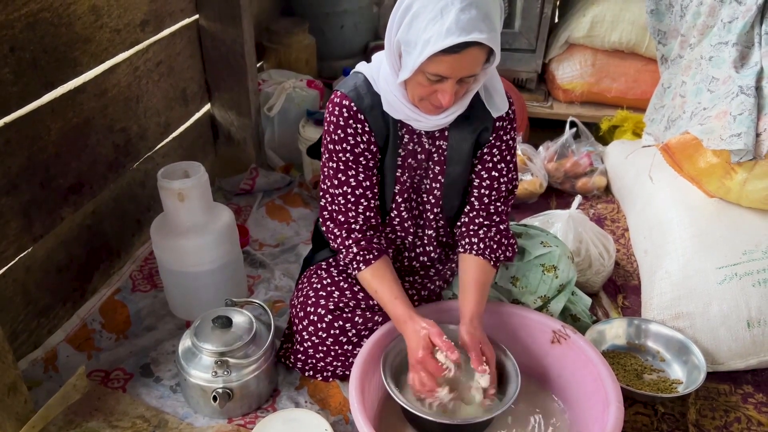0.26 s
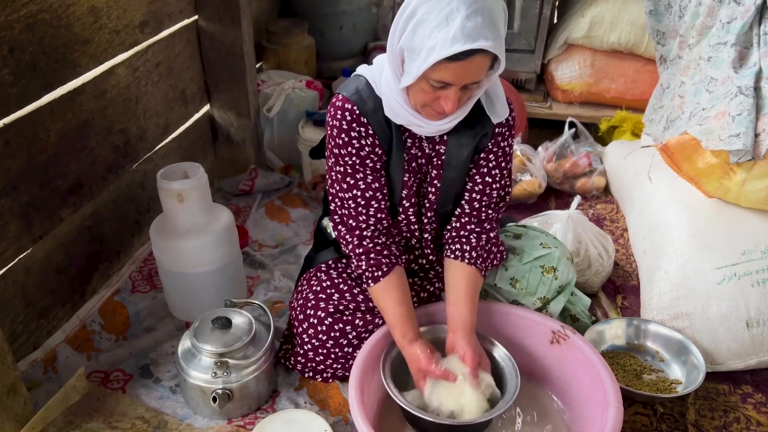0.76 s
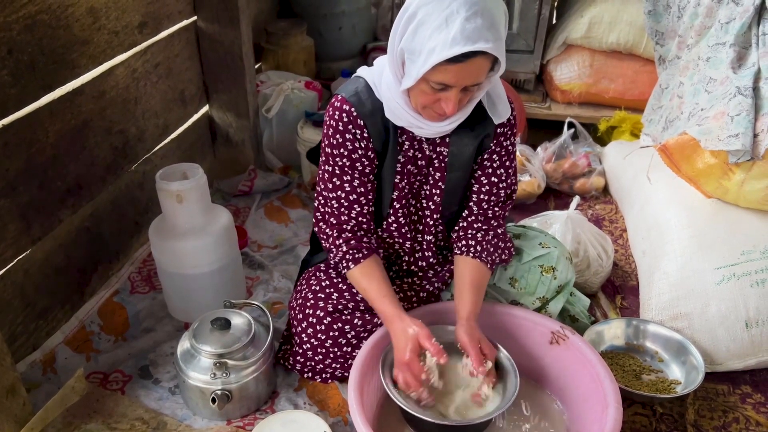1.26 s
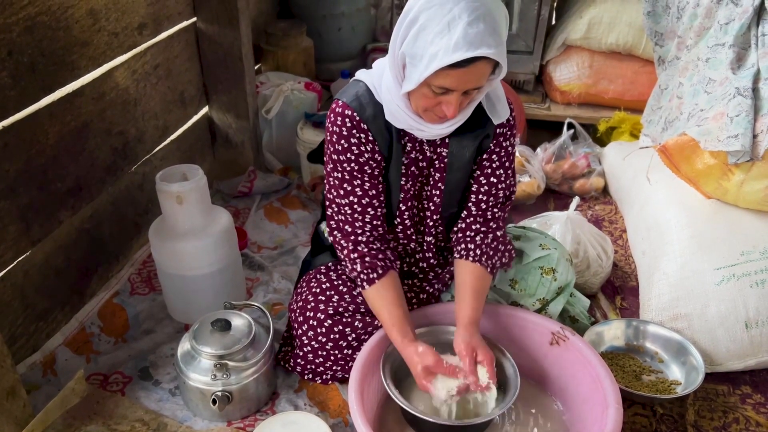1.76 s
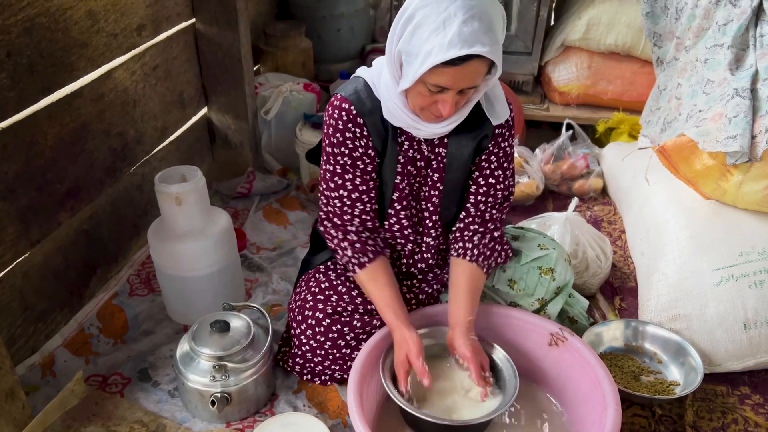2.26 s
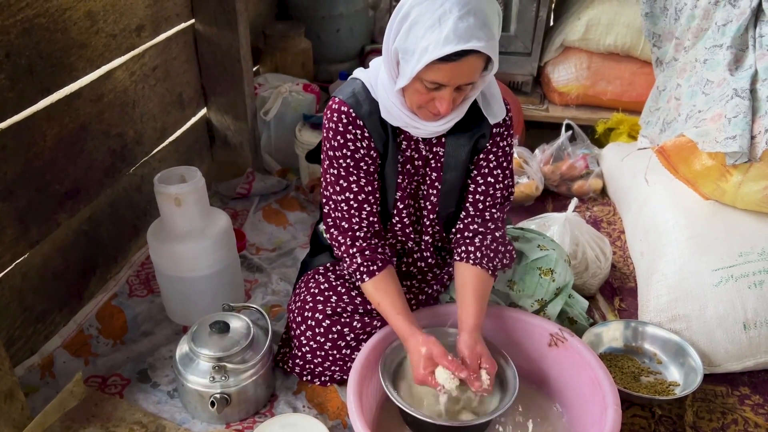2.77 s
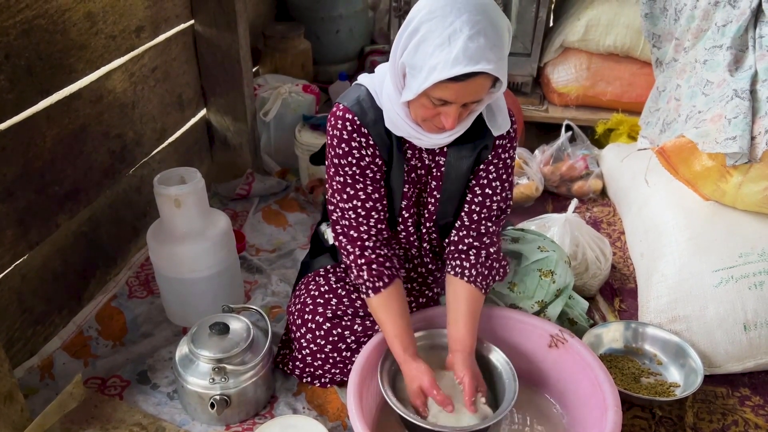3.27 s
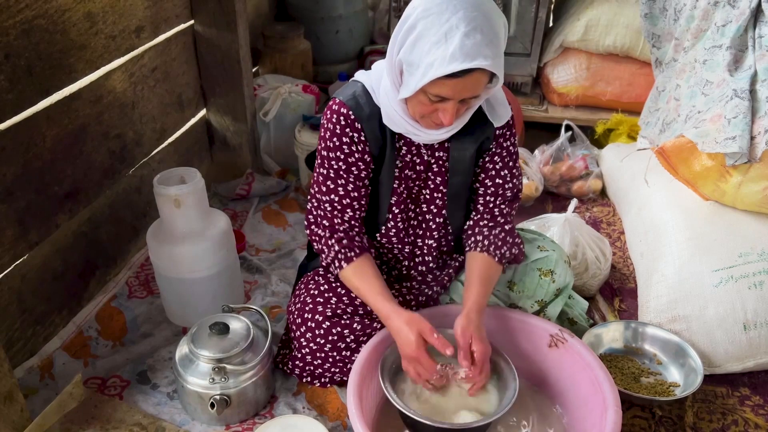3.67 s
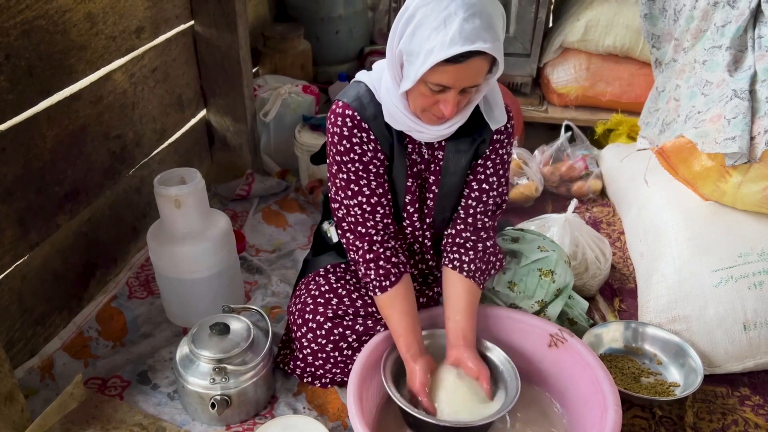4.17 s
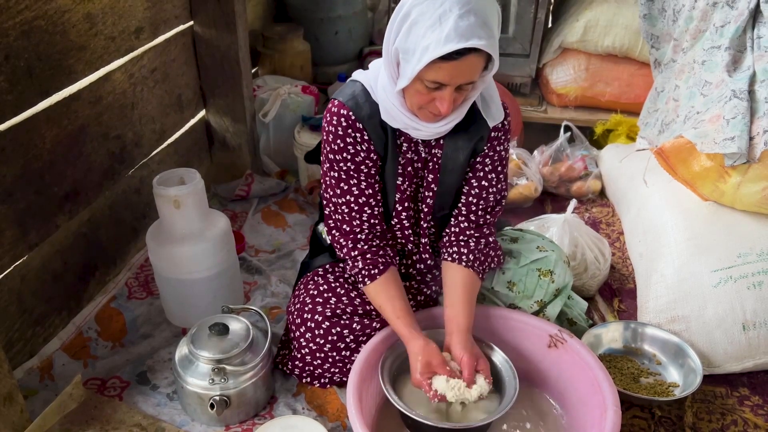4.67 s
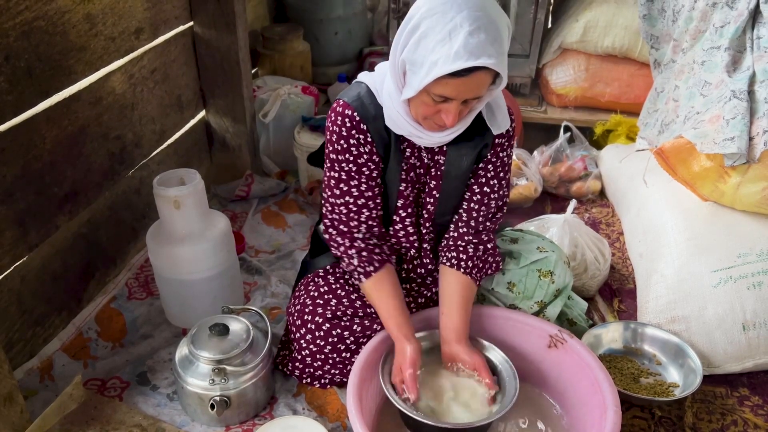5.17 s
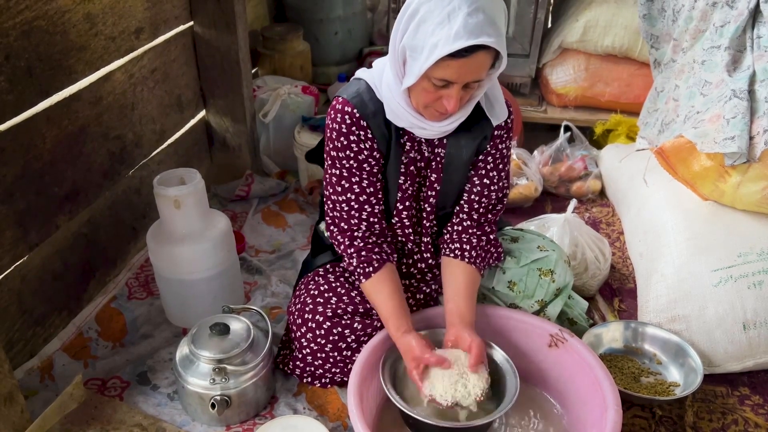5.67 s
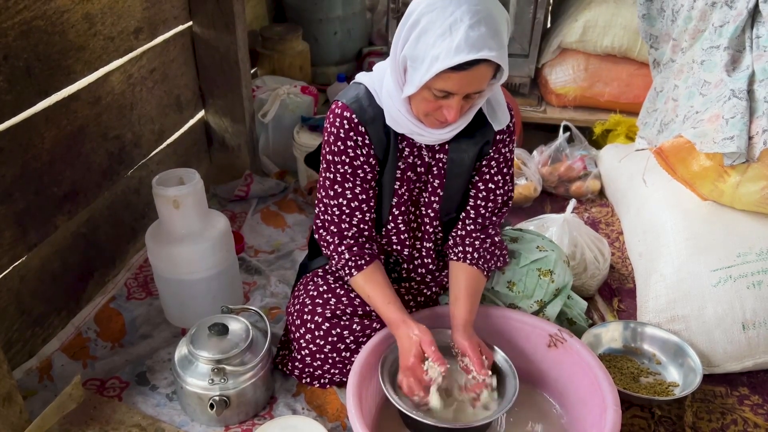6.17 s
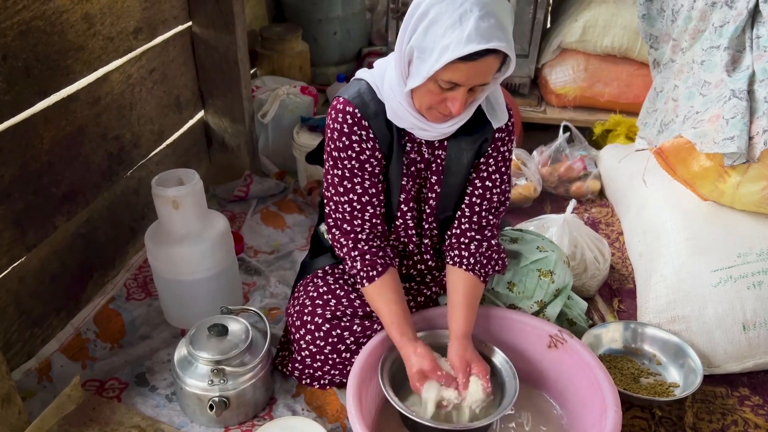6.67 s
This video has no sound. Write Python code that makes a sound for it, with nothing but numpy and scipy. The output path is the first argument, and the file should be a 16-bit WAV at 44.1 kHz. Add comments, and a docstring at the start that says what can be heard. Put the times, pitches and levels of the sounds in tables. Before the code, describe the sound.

Close, watery rice washing: gritty swishing strokes, bubbling gurgles and scattered drippy plops in a small dry room, over very faint low wind rumble.

```python
"""Two hands rub and swish rice in a metal bowl of water in a small, draughty wooden hut, over faint wind rumble.
From the start, strokes of filtered-noise hiss and gurgling swarms of decaying sines come and go, with sine plops
and noise-burst splashes; two gusts in the first second lift the edge of a wind filter, which hollows out the lower
range. The strongest plop comes near 2.7 s, a strong splash just after; from 4 s on four gusts lift the edge again.
A spaced pair of microphones hears it all, with a short room tail; the last stroke, near 6.7 s, gurgles loudest."""
import sys
import numpy as np
from scipy import signal
from scipy.fft import rfft, irfft
from scipy.io import wavfile
from scipy.ndimage import uniform_filter1d

SR = 44100
rng = np.random.default_rng(int(sys.argv[2]) if len(sys.argv) > 2 else 0)


def master(y):
    """Save y as 16-bit WAV."""
    cut = np.clip(np.atleast_2d(y).T, -1, 1)
    pcm = np.round(cut * 32767)  # scale
    wavfile.write(sys.argv[1], SR, pcm.astype(np.int16))


N = 305172
HZ = np.fft.rfftfreq(N, 1 / SR)

# Strokes of the hands. Each row: full strength at seconds, length in seconds, then relative levels in dB
# of grain hiss, fine spray and gurgle.
STROKES_S_DB = [(0.0, 0.0069, -52.5, -45.5, -42), (0.256, 0.04, -45, -42, -43.5),
                (0.415, 0.038, -53.5, -49.5, -52), (0.79, 0.11, -48.5, -53, -43.5),
                (1.057, 0.31, -48, -44, -59), (1.295, 0.029, -46.5, -41.5, -43.5),
                (1.782, 0.16, -50, -55, -39.5), (2.094, 0.16, -48.5, -42.5, -42),
                (2.675, 0.029, -43.5, -41, -37), (2.874, 0.15, -47, -49, -45.5),
                (3.017, 0.081, -49, -47.5, -47), (3.569, 0.023, -48.5, -53, -44.5),
                (3.796, 0.013, -51, -50, -47), (3.983, 0.06, -58.5, -59.5, -60),
                (4.64, 0.022, -51, -59, -50), (4.847, 0.28, -51, -46.5, -50),
                (5.424, 0.44, -54.5, -59.5, -47.5), (5.871, 0.02, -51.5, -54.5, -37),
                (6.075, 0.28, -50, -42, -53.5), (6.718, 0.057, -45.5, -48, -34.5)]
# How a layer's strokes swell, sag while they last and die. Each: swell in dB/s, sag in dB/s, release in dB/s,
# relative level between strokes in dB.
HISS_SHAPE = (150, 5, 48.5, -56.5)
SPRAY_SHAPE = (164, 14, 79.5, -66.5)
GURGLE_SHAPE = (317.5, 25, 113.5, -60)
# Spectrum of the grain noise. Each row: frequency in Hz, relative density in dB.
HISS_HZ_DB = [(250, 7), (900, 4), (2000, 7.5), (3500, 1), (5500, 2.5), (7500, 1), (11000, -3.5),
              (16000, -4)]
# Air pockets. Each row: start in seconds, relative level in dB, starting pitch in Hz.
PLOPS_S_DB_HZ = [(0.4, -32, 873), (0.402, -34, 590), (0.722, -25.5, 1840), (0.7434, -26, 1730),
                 (0.8, -27, 1166), (0.801, -27.5, 1780), (0.8226, -24.5, 1790), (0.852, -33, 1590),
                 (0.959, -31, 1140), (1.172, -26.5, 903), (1.262, -18.5, 890), (1.29, -30.5, 2040),
                 (1.31, -28, 1150), (1.698, -25.5, 931), (1.836, -22, 622), (2.135, -25.5, 1030),
                 (2.503, -30, 1700), (2.566, -33, 895), (2.659, -24, 1036), (2.677, -10.5, 929),
                 (2.702, -27.5, 930), (2.729, -28.5, 990), (2.747, -27.5, 805), (2.829, -31, 870),
                 (2.878, -28, 1540), (2.97, -31, 2050), (3.013, -25.5, 970), (3.494, -27.5, 1470),
                 (3.517, -30.5, 913), (3.564, -23.5, 940), (3.594, -33, 1090), (3.612, -28.5, 1080),
                 (3.627, -30, 2200), (3.844, -29.5, 1200), (4.105, -35, 934), (4.121, -27, 2000),
                 (4.615, -23, 986), (4.751, -33.5, 1053), (5.423, -25, 1330), (5.422, -27.5, 890),
                 (5.668, -28.5, 870), (5.889, -28.5, 1930), (5.893, -32, 1050), (5.978, -31.5, 948),
                 (6.141, -26.5, 1140), (6.307, -30.5, 1385), (6.676, -24.5, 1190), (6.684, -24.5, 702),
                 (6.761, -31, 1020), (6.869, -34, 1860)]
# Splashes. Each row: start in seconds, relative level in dB, starting bubble pitch in Hz,
# relative crack level in dB, added to the splash level.
SPLASHES_S_DB_HZ_DB = [(0.2337, -27.5, 5700, 1), (0.2498, -31, 5200, 10), (0.7563, -31, 4530, -12),
                       (1.032, -30, 2400, -8), (1.151, -26, 2880, -4), (1.262, -27.5, 4400, 9),
                       (1.3433, -27, 1810, 2.5), (1.486, -33.5, 2050, -2), (2.0277, -37.5, 2760, 6.5),
                       (2.0711, -47.5, 1520, 24), (2.091, -32.5, 2000, 3), (2.188, -26.5, 2820, -13),
                       (2.2494, -27.5, 2430, -2), (2.7266, -17, 2240, -13.5), (2.915, -29, 1940, 4.5),
                       (3.759, -39, 2800, 1), (3.836, -29, 2820, 6.5), (4.804, -31.5, 2720, -6),
                       (4.889, -31.5, 5200, -1), (5.0055, -29, 1510, -21), (5.027, -25.5, 6600, -3.5),
                       (5.0888, -28.5, 1950, -6), (5.136, -37, 2540, 9), (5.417, -32.5, 1282, -3.5),
                       (6.199, -35, 2240, 8), (6.2684, -34, 1878, 3), (6.6753, -28, 1790, 7.5),
                       (6.859, -34, 2250, -5)]
# Direct sound at the pair. Each row: frequency in Hz, phase in radians by which left leads right.
LEFT_LEAD_HZ_RAD = [(0, 0), (6500, 0), (7800, 1.1), (16500, -14.3)]
# Direct sound at the pair. Each row: frequency in Hz, left minus right in dB.
LEFT_LOUDER_HZ_DB = [(1000, 0), (2400, -1.5), (4400, 5.5), (15000, -1.5)]
# Edge of the wind filter between gusts. Each row: time in seconds, edge in Hz.
CALM_EDGE_S_HZ = [(0, 240), (.3, 700), (1.0, 517), (1.19, 169), (1.43, 294), (1.66, 541), (2.3, 494),
                  (2.45, 640), (2.6, 420), (3.0, 503), (3.7, 682), (4.0, 910), (6.92, 895)]
# Gusts. Each row: start in seconds, length of the climb in seconds, highest edge in Hz,
# time constant of the sinking in seconds.
GUSTS_S_S_HZ_S = [(0.272, 0.11, 1750, 0.35), (0.59, 0.066, 1670, 0.16), (4, 0.094, 1450, 0.11),
                  (4.279, 0.29, 3010, 0.28), (5.208, 0.16, 2550, 0.25), (6.285, 0.38, 3200, 0.2)]
# Strength of the rumble. Each row: time in seconds, relative level in dB.
WIND_S_DB = [(0.0, -78), (0.19, -86.5), (0.38, -74.5), (2.23, -85), (5.65, -72.5), (6.05, -78.5),
             (6.88, -72)]
# Spectrum of the rumble. Each row: frequency in Hz, relative density in dB.
RUMBLE_HZ_DB = [(20, -52), (45, -5.5), (120, -4), (580, -6), (1000, -25), (1400, -91)]

GURGLE_LOSS_DB_PER_OCTAVE = 11.5   # of the bed between strokes, as the edge climbs over 800 Hz
CLIMB_S = 0.29   # time constant of the edge's climb
STOP_HZ = 16300   # top cut: 70 dB down from here


def hiss(hiss_db, spray_over_hiss_db):
    """Grains grind under water among small bubbles, with a sparser fine spray on top; each range clumps.
    Rows: the part both ports share, then the scattered part of each port."""
    noise = irfft(rfft(rng.standard_normal((3, N))) * from_db(at_hz(HISS_HZ_DB)), N)
    noise = noise / np.std(band(noise[0], 2770, 8350)) * from_db([[0], [-2.2], [-2.2]])

    stroke = grainy(50, 4.5, 0.009)   # lumps common to all ranges
    slosh_clumps, grind_clumps, spray_clumps = [
        0.51 + 0.37 * stroke + 0.31 * grainy(60, 5.46, 0.007) for _ in range(3)]

    slosh = band(noise, 170, 1680)
    slosh[0] += from_db(1.5) * swarm(907, 3360, 4.8, 21.1, count=2200)

    edges_hz = np.geomspace(1900, 8600, num=6)   # narrow ranges rub in patches of their own
    grind = np.zeros((3, N))
    for k in range(1, len(edges_hz)):
        patches = 0.34 + 0.56 * grainy(45, 5.26, 0.0082)
        grind += (-1) ** k * band(noise, edges_hz[k - 1], edges_hz[k]) * patches
    ticks = np.array([swarm(2600, 8500, 5, 18, count=700) for _ in noise])
    grind += from_db(-7) * ticks * grainy(40, 2.1, 0.015)   # ticks in clusters

    spray = band(noise, 6060, 15000) * (0.52 + 0.26 * grainy(270, 9.3, 0.00028)) * [[1], [0.5], [0.5]]
    spray = from_db(spray_over_hiss_db + 5.0) * spray
    return from_db(hiss_db - 5.5) * (slosh * slosh_clumps + grind * grind_clumps + spray * spray_clumps)


def gurgle(level_db):
    """Air pockets ring as a dense swarm of low bubbles."""
    tones = band(swarm(663, 1253, 7.1, 34, count=1900), 547, 1034, order=6)
    return from_db(level_db - 7.5) * rms_one(tones)


def stroke_level(level_db, shape):
    """Relative level in dB of one layer: strokes sum in power, each swelling, sagging and dying, over a bed."""
    swell, sag, release, bed_db = shape
    s, length_s = np.transpose(STROKES_S_DB)[:2, :, None]
    t = np.arange(N // 64 + 2) * 64 / SR
    loss_db = swell * np.maximum(s - t, 0) + sag * np.maximum(t - s, 0)
    loss_db = loss_db + release * np.maximum(t - s - length_s, 0)
    strokes = np.sqrt(np.sum(from_db(level_db[:, None] - loss_db) ** 2, axis=0))
    return 20 * np.log10(np.hypot(np.interp(np.arange(N) / SR, t, strokes), from_db(bed_db)))


def plops():
    """Bubbles swell for a few cycles; each is followed by a weaker one pinched off just after."""
    s, level_db, hz = np.transpose(PLOPS_S_DB_HZ)
    late, detune = rng.random((len(s), 2)).T
    first = bubbles(s, from_db(level_db + 10.5), hz, 17.5, rise=0.073, attack_s=2.57 / hz[:, None])
    second_s = s + 0.00586 + 0.00979 * late
    second_hz = hz * (0.845 + 0.39 * detune)
    second = bubbles(second_s, from_db(level_db + 1.5), second_hz, 12.4, rise=0.26, attack_s=0.0018)
    return band(first + second, 590, 3200)


def splashes():
    """A splash is a crack of spray and a short wash; returned apart from them, the bubble it traps."""
    s, level_db, hz, crack_db = np.transpose(SPLASHES_S_DB_HZ_DB)
    crack = burst(s, from_db(level_db + crack_db - 6.0), 0.00025, 0.0023, 4300, 12000)
    wash = burst(s, from_db(level_db - 15.0), 0.0011, 0.019, 1100, 3700)
    wash = wash * (0.5 + 0.5 * grainy(330, 3.5, 0.024))
    trapped = bubbles(s, from_db(level_db), hz, 42, rise=0.095, attack_s=0.00023)
    return crack + wash, trapped


def microphones(x, room_db, t60_s):
    """Direct sound reaches the two ports with a phase and level step; the hut adds its own tail to each."""
    t = np.arange(int(0.25 * SR)) / SR
    tails = rng.standard_normal((2, len(t))) * from_db(-60 * t / t60_s) * (t > 0.002)
    tails = tails / np.sqrt(np.sum(tails ** 2, axis=1, keepdims=True))
    hz, lead_rad = np.transpose(LEFT_LEAD_HZ_RAD)
    # half of each difference goes to either side
    step = from_db(at_hz(LEFT_LOUDER_HZ_DB) / 2) * np.exp(0.5j * np.interp(HZ, hz, lead_rad))
    direct = np.array([step, 1 / step])
    dull = from_db(room_db) / (1 + (HZ / 7000) ** 2)   # cloth and sacks swallow the treble
    return irfft(rfft(x) * (direct + dull * rfft(tails, N)), N)


def filter_edge():
    """Each gust drives the edge up from its calm height, ever more slowly; then it sinks back."""
    t = np.arange(N) / SR
    calm_hz, = in_time(CALM_EDGE_S_HZ)
    edge_hz = calm_hz
    for start_s, length_s, top_hz, sink_s in GUSTS_S_S_HZ_S:
        climb = np.expm1(-np.clip(t - start_s, 0, length_s) / CLIMB_S) / np.expm1(-length_s / CLIMB_S)
        sink = np.exp(-np.maximum(t - start_s - length_s, 0) / sink_s)
        edge_hz = np.maximum(edge_hz, calm_hz + (top_hz - calm_hz) * climb * sink)
    return edge_hz


def wind_filter(x, edge_hz, leak_db):
    """Short-time spectrum lines under the moving edge are turned down by an uneven multiple of leak_db."""
    hz, s, frames = signal.stft(x, SR, nperseg=1024, noverlap=768)
    at = np.minimum((s * SR).astype(int), N - 1)
    uneven = rng.uniform(0.55, 1.3, (len(hz) // 3, 1)).repeat(3, axis=0)   # some bands are held down harder
    uneven = uneven + 0.5 * (hz[:, None] > edge_hz[at] - 280)   # deepest just under the edge
    above = np.clip((hz[:, None] - edge_hz[at]) / 120 + 0.5, 0, 1)
    frames = frames * from_db(leak_db[at] * uneven * (1 - above))
    return signal.istft(frames, SR, nperseg=1024, noverlap=768)[1][..., :N]


def rumble():
    """Lumpy wind on the ports: low noise, partly shared by both sides."""
    mid, side = irfft(rfft(rng.standard_normal((2, N))) * from_db(at_hz(RUMBLE_HZ_DB)), N)
    # high-passed difference: the deepest part is common
    side = signal.lfilter([1, -1], [1, -np.exp(-2 * np.pi * 250 / SR)], side)
    lumps_db = 2.5 * rms_one(band(rng.standard_normal(N), 1.5, 12, order=1))
    lumps = rms_one(from_db(lumps_db))
    pair = (mid + 0.69 * side * [[1], [-1]]) / np.std(band(mid, 66, 267))
    return from_db(in_time(WIND_S_DB)[0]) * lumps * pair


def bubbles(s, gain, hz, cycles, rise, attack_s):
    """Each bubble is a sine, decaying 60 dB in `cycles`, whose pitch climbs as it nears the surface."""
    size = min(int(cycles / hz.min() * SR), 1600)
    t = np.arange(size) / SR
    turns = hz[:, None] * t
    shape = np.exp(-np.log(1000) * turns / cycles) * (1 - np.exp(-t / attack_s)) ** 2
    phase = 2 * np.pi * (turns + rise * turns ** 2 / (2 * cycles))
    sound = gain[:, None] * shape * np.sin(phase)
    at = (s * SR).astype(int)[:, None] + np.arange(size)
    return np.bincount(at.ravel(), sound.ravel(), N + size)[:N]


def swarm(low_hz, high_hz, spread_db, cycles, count):
    """Bubbles at random moments, pitches and sizes; rms 1."""
    when, pitch, size = rng.random((count, 3)).T
    gain = from_db(-spread_db * np.log(np.maximum(size, 0.04)))
    hz = low_hz * (high_hz / low_hz) ** pitch
    return rms_one(bubbles(when * N / SR, gain, hz, cycles, rise=0.15, attack_s=0.00019))


def grainy(per_s, spread_db, decay_s):
    """Envelope of many small collisions of uneven size, each swelling and dying quickly; rms 1."""
    size_db = spread_db * np.minimum(rng.exponential(1, N), 4.2)
    energy = from_db(2 * size_db) * (rng.random(N) < per_s / SR)
    dying = signal.lfilter([1], [1, -np.exp(-1 / (decay_s * SR))], energy + 1e-12)
    smooth = uniform_filter1d(dying, int(decay_s * SR / 2))
    return rms_one(np.sqrt(smooth.clip(0)))   # rounding can dip below zero


def burst(s, gain, attack_s, decay_s, low_hz, high_hz):
    """Puffs of band noise that swell quickly and die away."""
    puffs = np.full(N, 1e-18)
    puffs[(s * SR).astype(int)] = gain
    dying = signal.lfilter([1], [1, -np.exp(-1 / (decay_s * SR))], puffs)
    swell = np.exp(-1 / (attack_s * SR))
    envelope = signal.lfilter([1 - swell], [1, -swell], dying)
    return envelope * rms_one(band(rng.standard_normal(N), low_hz, high_hz))


def band(x, low_hz, high_hz, order=2):
    """Butterworth band-pass."""
    return signal.sosfilt(signal.butter(order, [low_hz, high_hz], "band", fs=SR, output="sos"), x)


def from_db(db):
    """Decibels to gain."""
    return 10 ** (np.asarray(db) / 20)


def rms_one(x):
    """Scale to rms 1."""
    return x / np.sqrt(np.mean(x ** 2) + 1e-20)


def in_time(rows):
    """Each column after the time as a value per sample."""
    s, *columns = np.transpose(rows)
    return [np.interp(np.arange(N) / SR, s, c) for c in columns]


def at_hz(points):
    """A spectrum table read at every FFT line, on a log frequency axis."""
    hz, value = np.transpose(points)
    return np.interp(np.log(HZ + 1), np.log(hz + 1), value)


def scene():
    """Broad noise falls to the wind filter; under a high edge, louder gurgle leaks more; tones pass lower."""
    edge_hz = filter_edge()
    deep_db = np.full(N, -50.0)

    hiss_db, spray_db, gurgle_db = np.transpose(STROKES_S_DB)[2:]
    hiss_db = stroke_level(hiss_db, HISS_SHAPE)
    spray_db = stroke_level(spray_db, SPRAY_SHAPE)
    *gurgle_slopes, bed_db = GURGLE_SHAPE
    bed_db = bed_db - GURGLE_LOSS_DB_PER_OCTAVE * np.log2(np.maximum(edge_hz / 800, 1))
    gurgle_db = stroke_level(gurgle_db, (*gurgle_slopes, bed_db))

    gurgling = gurgle(gurgle_db)
    splash_noise, trapped = splashes()
    grains = hiss(hiss_db, spray_db - hiss_db)
    broad = microphones(grains[0] + splash_noise, room_db=-1.5, t60_s=0.12) + grains[1:]
    # the louder the gurgle, the more broad noise leaks under a high edge
    leak_db = np.where(edge_hz > 900, np.clip(gurgle_db + 29.0, -50, -27), deep_db)
    broad = wind_filter(broad, edge_hz, leak_db)
    broad = wind_filter(broad, np.minimum(edge_hz, 700), deep_db)

    tones = wind_filter(gurgling, np.minimum(edge_hz, 780), deep_db) + plops() + trapped
    tones = microphones(tones, room_db=-3.0, t60_s=0.11)
    tones = wind_filter(tones, np.minimum(edge_hz, 550), deep_db)
    return broad + tones + rumble()


def record(dry):
    """A steep low-pass cuts the top."""
    return signal.sosfilt(signal.cheby2(14, 70, STOP_HZ, fs=SR, output="sos"), dry)


dry = scene()
out = record(dry)
master(out)
```